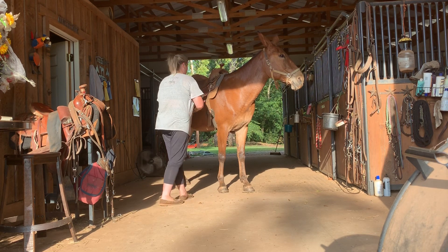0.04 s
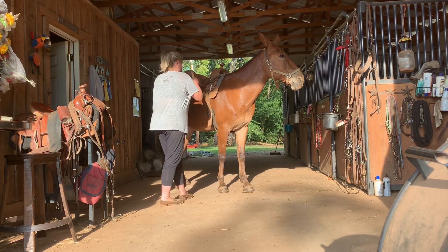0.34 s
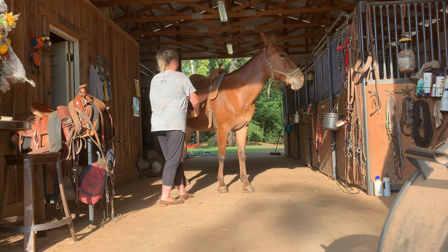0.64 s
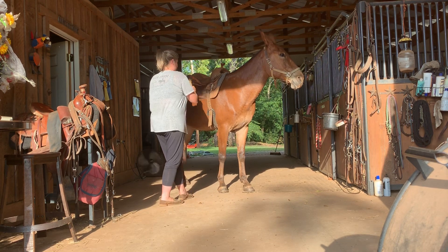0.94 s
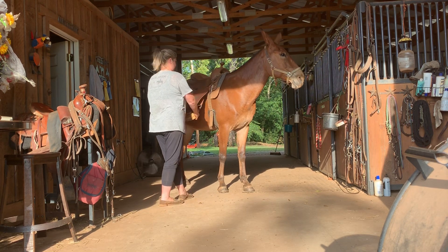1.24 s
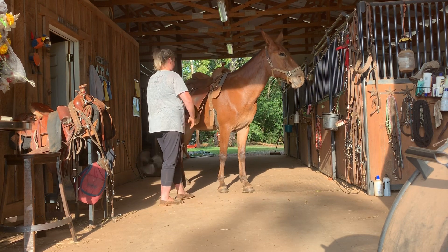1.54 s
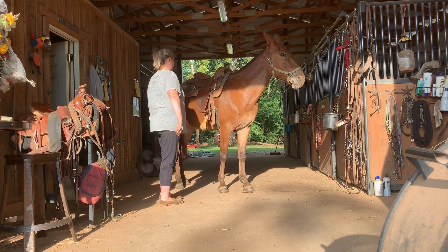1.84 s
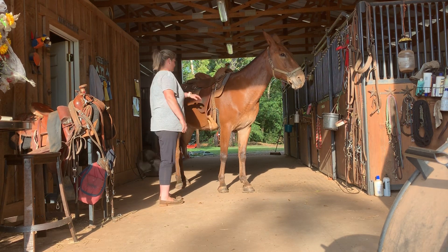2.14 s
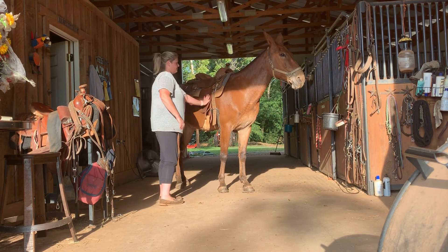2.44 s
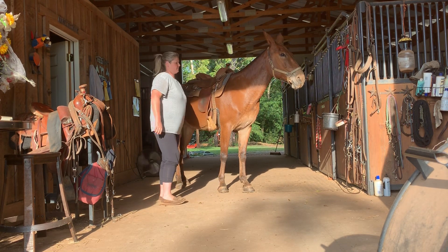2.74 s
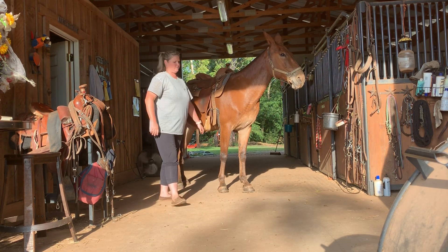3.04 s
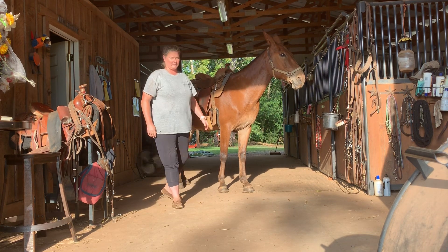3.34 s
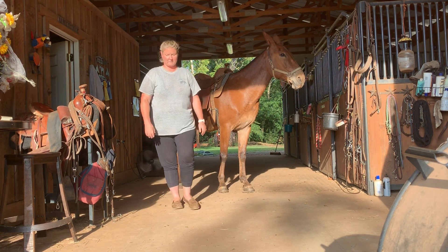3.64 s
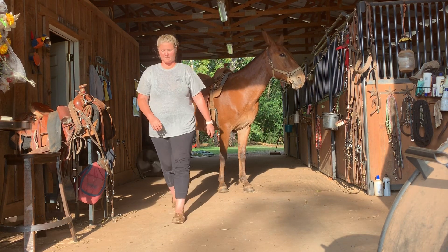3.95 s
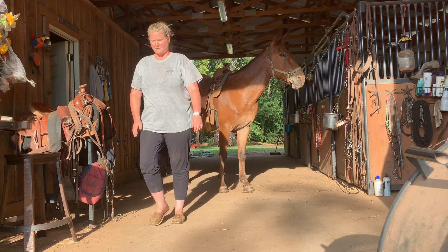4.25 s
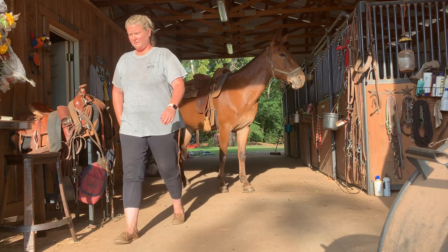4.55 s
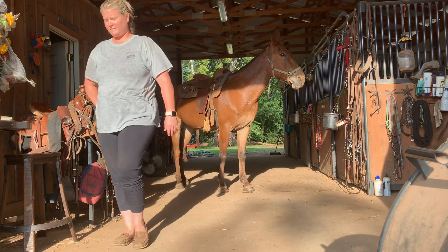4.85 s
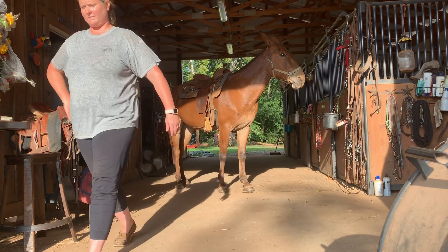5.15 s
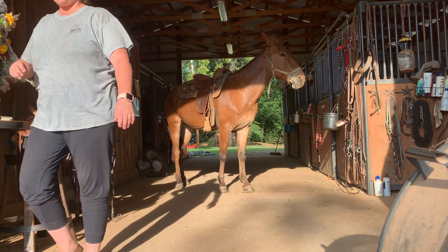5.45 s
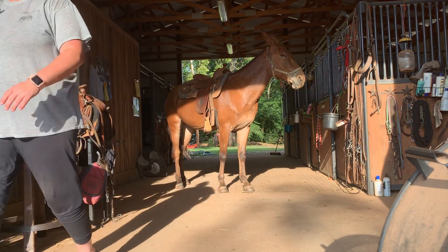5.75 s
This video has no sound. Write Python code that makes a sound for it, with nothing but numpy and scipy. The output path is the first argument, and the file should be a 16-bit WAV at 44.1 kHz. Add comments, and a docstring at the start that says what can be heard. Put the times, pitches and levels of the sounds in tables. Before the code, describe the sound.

After a faint rustle of tack, two sharp leather slaps land in quick succession on a saddle in front of the microphone, each popping with trapped air and echoing briefly off wooden barn walls. Dull, quiet footsteps follow, with light scuffs and a little clothing rustle. Throughout, a large fan to the right fills the aisle with rushing air and low, wavering tones.

```python
"""A big fan drones off to the right in the aisle of a wooden barn: rushing air, wavering blade tones.
Tack and clothing rustle faintly, then a leather saddle flap is slapped down twice on a standing mule.
Each slap is a light touch, then a crack and a pop of trapped air; the padded saddle thuds and rings,
walls and roof throw the slap back, and a buckle ticks. Soft shoes then pad and scuff on the floor."""
import sys
import numpy as np
from scipy import signal
from scipy.fft import rfft, irfft
from scipy.io import wavfile
from scipy.ndimage import uniform_filter1d

SR = 44100
rng = np.random.default_rng(int(sys.argv[2]) if len(sys.argv) > 2 else 0)


def generate_wav(signal):
    """Clip the signal to [-1, 1] and save it as 16-bit WAV at the path in sys.argv[1]."""
    frames = np.transpose(np.atleast_2d(signal))
    scaled = np.clip(frames, -1, 1) * 32767
    pcm = np.round(scaled).astype(np.int16)
    wavfile.write(sys.argv[1], SR, pcm)


N = 255780

# fan's rush of air (frequency [Hz], relative density [dB])
RUSH_SPECTRUM = [(20, -35), (32, -15), (48, -8.5), (66, -9), (80, -0.5), (122, -3.5), (150, -1.5),
                 (200, -1.5), (450, -2.5), (800, -7.5), (1200, -11), (1900, -16.5), (2700, -22),
                 (4100, -26), (4750, -32.5), (5600, -35), (8500, -38), (15000, -44)]
# slow trim of the rush (time [s], gain [dB])
RUSH_TRIM = [(0, 0.66), (2.8, -0.1), (4, 0.3), (5.8, 0.37)]
# aisle resonances stirred by the fan (frequency [Hz], width [Hz], boost [dB])
AISLE_MODES = [(92.3, 3.9, 9.6), (140.8, 11.2, 8.5), (201, 19, 4.2), (435, 9.9, 3.4), (640, 12, 4.1)]
# blade-passing tones (harmonic [-], level [dB])
BLADE_TONES = [(1, -43), (2, -42.5), (3, -40.5), (4, -47), (5, -56), (8, -48.5)]
# shading of the left microphone from the fan (frequency [Hz], left minus right [dB])
FAN_SHADE = [(100, -3), (400, -3.5), (1050, -8.5), (1750, -2), (2800, -4), (5200, 2.5), (9000, 0)]
# straps and clothing (time [s], length [s], level [dB])
TACK_RUSTLES = [(0.148, 0.05, -47.5), (.222, .03, -52), (2.53, .15, -56), (4.69, .025, -53),
                (5.41, .04, -55), (5.63, 0.098, -55)]
# ticks of a strap's keeper (time [s], length [s], level [dB])
KEEPER_TICKS = [(.1608, .002, -45), (.1775, .002, -41), (.2072, .002, -41.5), (.2243, .002, -42.5)]
# colour of rustles and keeper (frequency [Hz], relative level [dB])
RUSTLE_SPECTRUM = [(2000, -25), (5000, 3), (8000, 10), (11000, 11), (14500, 10), (16000, 2)]
# light touches of the flap's edge
# (time [s], level [dB], decay [s], hollow [Hz], hollow boost at full share [dB], treble corner [Hz])
EDGE_TOUCHES = [(0.5719, 5.6, 0.0024, 3250, 7, 12000), (0.5772, -4, .0035, 1250, 17, 5000),
                (0.5822, -1, 0.005, 3550, 7, 10000), (1.1467, 2.3, 0.0055, 2080, 13, 30000)]
# flap landing flat (time [s], crack [dB], hollow [Hz], hollow boost at full share [dB], pop [dB],
# pop [Hz], pop half-width [cycles], sideways spill [Hz], place hit [0-1], thud half-width [s])
FLAP_SLAPS = [(0.5867, 6.3, 1540, 11.5, -10.5, 1000, .6, 710, 0, .005),
              (1.1522, 8.8, 2080, 11.5, -18.5, 1010, 1.4, 590, 1, .003)]
# colour of leather on leather (frequency [Hz], relative level [dB])
CRACK_SPECTRUM = [(100, 4), (400, -2.5), (900, 2.5), (1500, -2.5), (2100, -0.5), (2700, -3), (3400, -2),
                  (4200, -2), (5900, -8.5), (8000, -2.5), (11500, -10.5), (16000, -9)]
# padded saddle (frequency [Hz], t60 [s], level hit at place 0 [dB], level hit at place 1 [dB])
SADDLE_MODES = [(270, .1, -35, -37), (571, .09, -36, -11), (645, .12, -13.5, -36), (695, .33, -42, -21),
                (795, .13, -17, -33), (1615, .2, -26, -48), (1885, .3, -43, -26.5), (2020, .3, -28, -43),
                (4105, .16, -45, -27)]
# floor, wall and roof reflections (delay [s], crack gain [dB], signed spill gain [-])
FIRST_ECHOES = [(.0032, -17, -0.35), (.0072, -32, 0.4), (.0140, -18, 1.2), (.0184, -11, -1.1),
                (.0215, -16, .5), (.046, -18, -0.15)]
# dulling by wood and air (frequency [Hz], relative level [dB])
BARN_SPECTRUM = [(200, -1), (700, 1), (2000, 1), (5000, -.5), (8500, 0), (12000, -2), (14000, -8),
                 (16000, -11)]
# barn's tail (frequency [Hz], t60 [s])
BARN_DECAY = [(200, 0.44), (800, 0.52), (2000, 0.56), (5500, 0.46), (9000, 0.33), (15000, 0.25)]
# buckle knocks (time [s], level [dB], pitch factor [-])
BUCKLE_TICKS = [(0.6355, -25, .92), (1.1982, -19, 1)]
# buckle's ring (frequency [Hz], relative level [dB], t60 [s])
BUCKLE_MODES = [(2570, 0, .028), (2760, -2, .024)]
# soft soles landing (time [s], length [s], level [dB])
SOLE_STEPS = [(2.22, .06, -30.5), (2.35, .09, -30.5), (3.33, .13, -31), (3.88, .07, -33), (4.02, .1, -31.5),
              (4.63, .07, -35), (5.17, .07, -36), (5.65, .05, -33)]
# colour of a step (frequency [Hz], relative level [dB])
STEP_SPECTRUM = [(100, -24), (350, 4.5), (800, 2.5), (1300, -8.5), (2000, -15.5), (5000, -31), (16000, -39)]
# shoes scuffing (time [s], length [s], level [dB])
SHOE_SCUFFS = [(2.35, .04, -42.5), (3.36, .06, -42), (4.045, .035, -38), (4.64, .04, -41), (5.09, .03, -41),
               (5.315, .05, -38)]
# colour of a scuff (frequency [Hz], relative level [dB])
SCUFF_SPECTRUM = [(300, -10), (1500, 8), (3000, -1), (4500, -16), (9000, -20), (16000, -30)]

POP_LAG_S = .002
BIN_HZ = np.fft.rfftfreq(N, 1 / SR)
HIT_TIME_S = np.arange(SR // 3) / SR


def amp(db):
    """Decibels to gain."""
    return 10 ** (np.asarray(db) / 20)


def unit_rms(x):
    """Scales to rms 1."""
    return x / np.sqrt(np.mean(x ** 2) + 1e-20)


def lookup(points, hz):
    """Interpolates a table over log frequency."""
    f, value = np.transpose(points)
    return np.interp(np.log(hz + 1), np.log(f + 1), value)


def add(mix, time_s, sound):
    """Mixes a sound in at time_s."""
    part = mix[max(round(time_s * SR), 0):][:len(sound)]
    part += sound[:len(part)]


def delay(x, lag_s):
    """Delays by lag_s."""
    return np.pad(x, (max(round(lag_s * SR), 0), 0))[:N]


def colour(x, spectrum, size=2048):
    """Minimum-phase filter of unit energy."""
    log_gain = np.log(amp(lookup(spectrum, abs(np.fft.fftfreq(size, 1 / SR)))))
    taps = np.fft.ifft(np.exp(np.conj(signal.hilbert(log_gain)))).real
    return signal.oaconvolve(x, taps / np.linalg.norm(taps))[:N]


def drift(rate_hz):
    """Random wander below about rate_hz, rms 1."""
    lowpass = np.exp(-(BIN_HZ / rate_hz) ** 2) * (BIN_HZ > 0)
    return unit_rms(irfft(rfft(rng.standard_normal(N)) * lowpass, N))


def mic_pair(left, other, coherence):
    """Right blends left with other by |coherence|; negative phase makes right lead."""
    shared = np.clip(abs(coherence), 0, 1)
    right = shared * rfft(left) * np.exp(-1j * np.angle(coherence))
    right += np.sqrt(1 - shared ** 2) * rfft(other)
    return np.array([left, irfft(right, N)])


def fan_coherence(lead_s=.000319, floor_lag_s=.000577, floor_gain=.375, direct_db=1, top_hz=3050,
                  spacing_m=.099, sound_m_per_s=343):
    """Direct sound, combed by the floor, arrives right first; diffuse sound is alike only in the bass."""
    comb = abs(1 + floor_gain * np.exp(-2j * np.pi * BIN_HZ * floor_lag_s)) ** 2
    direct = amp(direct_db) ** 2 * comb / (1 + (BIN_HZ / top_hz) ** 2)
    diffuse = np.sinc(2 * BIN_HZ * spacing_m / sound_m_per_s)
    return (direct * np.exp(-2j * np.pi * BIN_HZ * lead_s) + diffuse) / (direct + 1)


def fan(rush_db=-25, flutter_db=.5, blade_hz=53.85, wobble_hz=.259, waver_db=2.5,
        hum_hz=237, hum_db=-47.5):
    """Turbulent air stirring the aisle, wavering blade tones and motor hum."""
    t = np.arange(N) / SR
    aisle_db = sum(db / (1 + (2 * (BIN_HZ - hz) / width_hz) ** 2) for hz, width_hz, db in AISLE_MODES)
    shape = amp(lookup(RUSH_SPECTRUM, BIN_HZ) + aisle_db)
    air = unit_rms(irfft(rfft(rng.standard_normal((2, N))) * shape, N))
    air *= amp(rush_db + np.interp(t, *np.transpose(RUSH_TRIM)) + flutter_db * drift(rate_hz=120))
    passes = np.cumsum(blade_hz + wobble_hz * drift(rate_hz=1.3)) / SR
    tones = amp(hum_db) * np.sin(2 * np.pi * hum_hz * t)
    for harmonic, db in BLADE_TONES:
        gain = amp(db + waver_db * drift(rate_hz=3.2))
        tones += gain * np.sin(2 * np.pi * (harmonic * passes + rng.random()))
    pair = mic_pair(air[0] + np.sqrt(2) * tones, air[1], fan_coherence())
    left_gain = amp(lookup(FAN_SHADE, BIN_HZ))
    shade = np.array([left_gain, np.ones_like(left_gain)]) / np.sqrt((1 + left_gain ** 2) / 2)
    return irfft(rfft(pair) * shade, N)


def grain_swells(events, spectrum, grains_per_s, spread_db=3):
    """Short swells of fine, dry grains."""
    envelope = np.zeros(N)
    for time_s, length_s, db in events:
        add(envelope, time_s, amp(db) * signal.windows.hann(round(length_s * SR)) ** .5)
    sizes = amp(spread_db * np.minimum(rng.exponential(1, N), 3)) * rng.choice([-1., 1.], N)
    grains = unit_rms(sizes * (rng.random(N) < grains_per_s / SR))
    return colour(envelope * grains, spectrum)


def tack_rustle():
    """Straps and clothing rub; a keeper ticks."""
    return grain_swells(TACK_RUSTLES + KEEPER_TICKS, RUSTLE_SPECTRUM, grains_per_s=4800)


def contact_burst(decay_s, hollow_hz, hollow_db, top_hz, rise_s=.00064, hollow_log_width=.13, size=2048):
    """Countless tiny contacts as the flap closes, coloured by the hollow beneath; unit energy."""
    t, hz = np.arange(size) / SR, np.fft.rfftfreq(size, 1 / SR)
    envelope = (1 - np.exp(-(t / rise_s) ** 2)) * np.exp(-t / decay_s)
    burst = rng.standard_normal(size)
    for _ in range(4):  # flatten the spectrum, keep the envelope
        local_rms = np.sqrt(abs(uniform_filter1d(burst ** 2, size=40)) + 1e-18)
        burst = envelope * np.tanh(burst / local_rms)
        burst = irfft(np.exp(1j * np.angle(rfft(burst))))
    hollow = amp(hollow_db * np.exp(-(np.log((hz + 1) / hollow_hz) / hollow_log_width) ** 2))
    burst = irfft(rfft(burst) * hollow / np.hypot(1, hz / top_hz))
    burst *= signal.windows.hann(2 * size)[size:]
    return burst / np.linalg.norm(burst)


def leather_cracks(hollow_share, crack_decay_s=.002, crack_top_hz=30000):
    """Leather meets leather: edge touches, then each hard crack; hollow_share scales the boost in dB."""
    out = np.zeros(N)
    landings = [(time_s, db, crack_decay_s, hollow_hz, hollow_db, crack_top_hz)
                for time_s, db, hollow_hz, hollow_db, *_ in FLAP_SLAPS]
    for time_s, db, decay_s, hollow_hz, hollow_db, top_hz in EDGE_TOUCHES + landings:
        add(out, time_s, amp(db) * contact_burst(decay_s, hollow_hz, hollow_share * hollow_db, top_hz))
    return colour(out, CRACK_SPECTRUM)


def crack_pair(hollow_shares, lead_s=.00003, shared_hz=3820):
    """Cracks from ahead; the wide flap sends each microphone its own treble."""
    coherence = np.exp(-2j * np.pi * BIN_HZ * lead_s) / (1 + (BIN_HZ / shared_hz) ** 2)
    left, other = (leather_cracks(share) for share in hollow_shares)
    return mic_pair(left, other, coherence)


def pulse(hz, half_width_s, lag_s):
    """Gaussian-windowed cosine centred on lag_s."""
    t = HIT_TIME_S - lag_s
    return np.exp(-(t / half_width_s) ** 2) * np.cos(2 * np.pi * hz * t)


def air_pops(spill_db=-10.5, spill_cycles=.97):
    """The flap squeezes out trapped air: the higher pop beams ahead, the lower spills sideways."""
    pop, spill = np.zeros((2, N))
    for time_s, _, _, _, pop_db, pop_hz, pop_cycles, spill_hz, _, _ in FLAP_SLAPS:
        add(pop, time_s, -amp(pop_db) * pulse(pop_hz, pop_cycles / pop_hz, POP_LAG_S))
        add(spill, time_s, -amp(spill_db) * pulse(spill_hz, spill_cycles / spill_hz, POP_LAG_S))
    return pop, spill


def ringing(modes, pitch=1):
    """Decaying sines of a struck object."""
    t = HIT_TIME_S
    return sum(amp(db - 60 * t / t60_s) * np.sin(2 * np.pi * hz * pitch * t) for hz, db, t60_s in modes)


def saddle_body(rise_s=.011, thud_hz=285, thud_db=-18, thud_lag_s=.0204):
    """The ring swells in over the first milliseconds; the thud arrives off the wall."""
    out = np.zeros(N)
    swell = 1 - np.exp(-(HIT_TIME_S / rise_s) ** 2)
    for time_s, *_, place, thud_s in FLAP_SLAPS:
        modes = [(hz, db0 + place * (db1 - db0), t60_s) for hz, t60_s, db0, db1 in SADDLE_MODES]
        add(out, time_s + POP_LAG_S, swell * ringing(modes))
        add(out, time_s, amp(thud_db) * pulse(thud_hz, thud_s, thud_lag_s))
    return out


def first_echoes(side_cracks, spill):
    """Floor, walls and roof return the sideways cracks and spilled pops."""
    cracks = [sum(amp(db) * delay(side, lag_s) for lag_s, db, _ in FIRST_ECHOES) for side in side_cracks]
    pops = sum(gain * delay(spill, lag_s) for lag_s, _, gain in FIRST_ECHOES)
    return np.array([colour(side, BARN_SPECTRUM) for side in cracks]) + pops


def barn_tail(x, build_s=.0089, shared_hz=900, clump_db=2):
    """Scattered echoes in uneven clumps; bass is alike at both microphones, treble dies first."""
    hz, t, noise = signal.stft(rng.standard_normal((2, SR)), SR, nperseg=256)
    hz = hz[:, None]
    shared = np.exp(-(hz / shared_hz) ** 2 / 2)
    noise[1] = shared * noise[0] + np.sqrt(1 - shared ** 2) * noise[1]
    clumps = uniform_filter1d(rng.standard_normal(noise.shape[1:]), size=9, axis=0)
    clumps = unit_rms(uniform_filter1d(clumps, size=2, axis=1))
    level_db = clump_db * clumps + lookup(BARN_SPECTRUM, hz) - 60 * t / lookup(BARN_DECAY, hz)
    tail = signal.istft(noise * amp(level_db), SR, nperseg=256)[1][:, :SR]
    tail *= 1 - np.exp(-(np.arange(SR) / SR / build_s) ** 2)
    return signal.fftconvolve(x[None], tail / np.linalg.norm(tail[0]), axes=1)[:, :N]


def buckle():
    """A buckle knocks once as the flap rebounds from each slap."""
    out = np.zeros(N)
    for time_s, db, pitch in BUCKLE_TICKS:
        add(out, time_s, amp(db) * ringing(BUCKLE_MODES, pitch))
    return out


def footsteps():
    """Soft soles pad dully on the floor."""
    return grain_swells(SOLE_STEPS, STEP_SPECTRUM, grains_per_s=3400)


def scuffs():
    """Shoes rub briefly over the floor."""
    return grain_swells(SHOE_SCUFFS, SCUFF_SPECTRUM, grains_per_s=3600)


def scene(spill_to_tail_db=-2):
    """Fan, rustles, two slaps with the barn's answer, and footsteps, in stereo."""
    cracks = crack_pair(hollow_shares=(.76, .81))
    side_cracks = crack_pair(hollow_shares=(.15, .15))  # little of the hollow's colour goes sideways
    pop, spill = air_pops()
    slaps = cracks + pop + saddle_body() + buckle()
    barn = first_echoes(side_cracks, spill) + barn_tail(side_cracks[0] + amp(spill_to_tail_db) * spill)
    rubbing = np.array([tack_rustle() + scuffs() for _ in range(2)])
    return slaps + barn + rubbing + footsteps() + fan()


def record(dry, edge_hz=15900):
    """Steep low-pass at edge_hz."""
    taps = signal.firwin(511, edge_hz, window=("kaiser", 9), fs=SR)
    return signal.oaconvolve(dry, taps[None], "same")


dry = scene()
out = record(dry)
generate_wav(out)
```